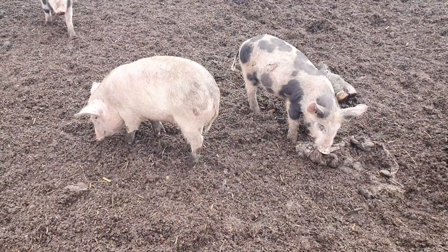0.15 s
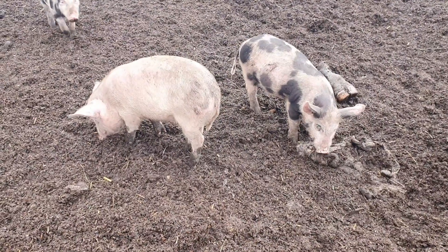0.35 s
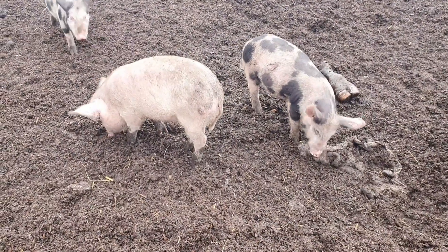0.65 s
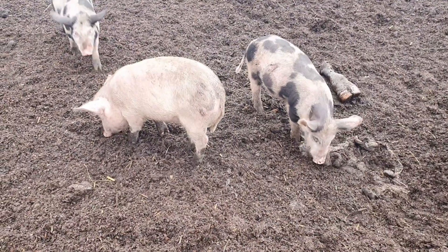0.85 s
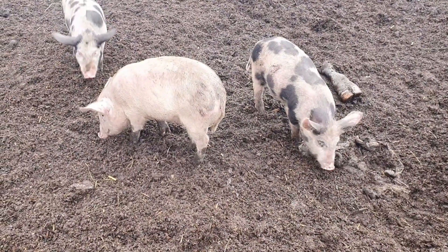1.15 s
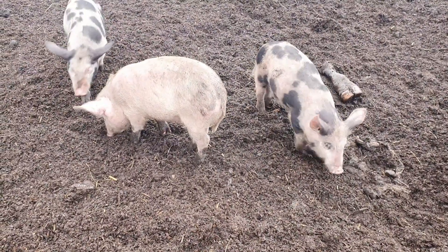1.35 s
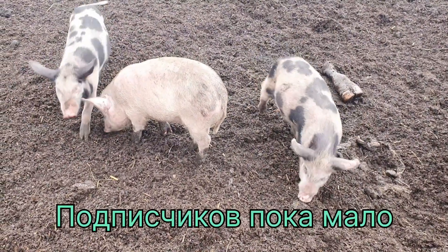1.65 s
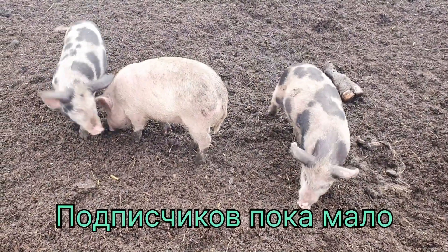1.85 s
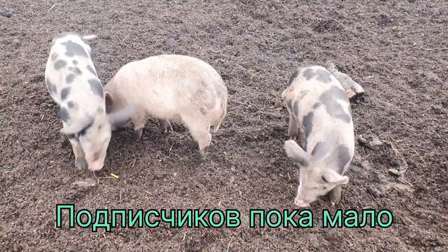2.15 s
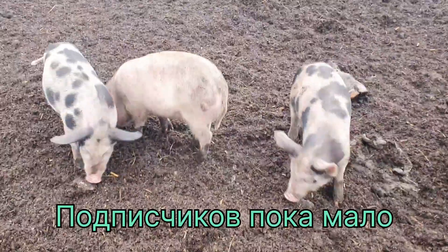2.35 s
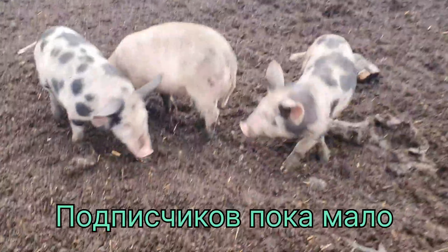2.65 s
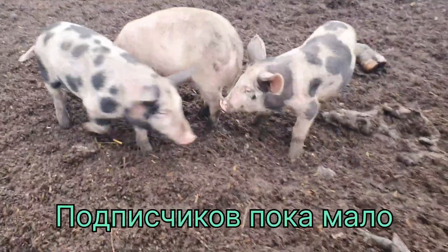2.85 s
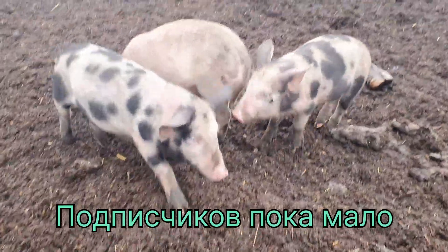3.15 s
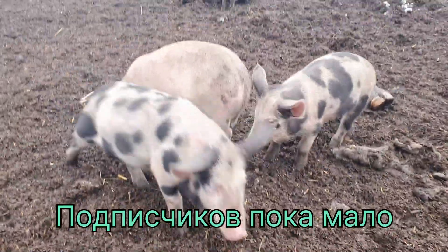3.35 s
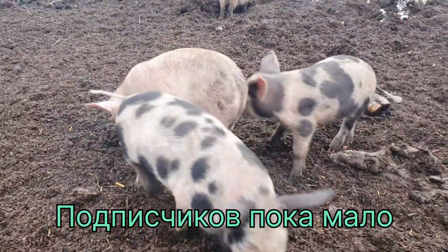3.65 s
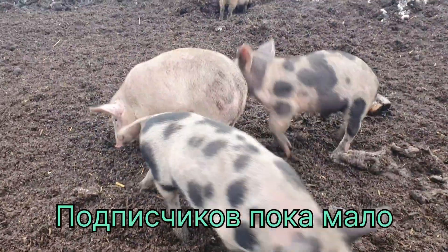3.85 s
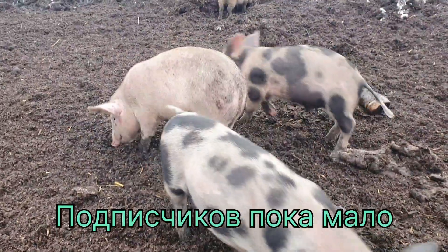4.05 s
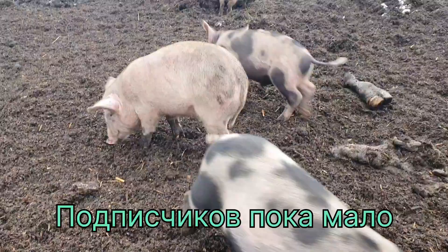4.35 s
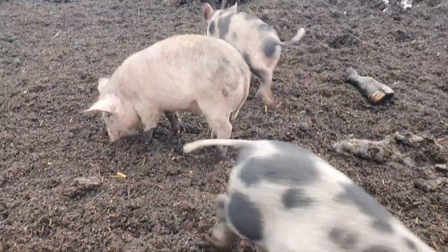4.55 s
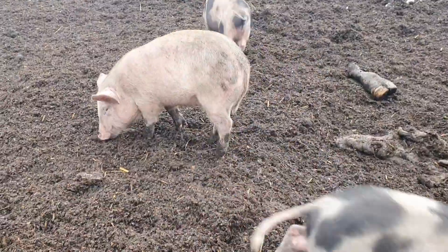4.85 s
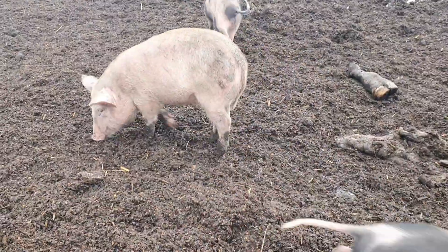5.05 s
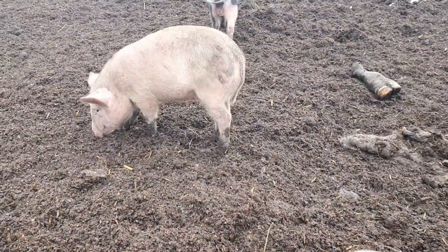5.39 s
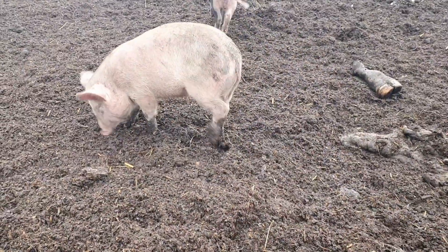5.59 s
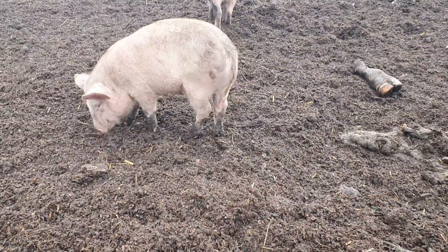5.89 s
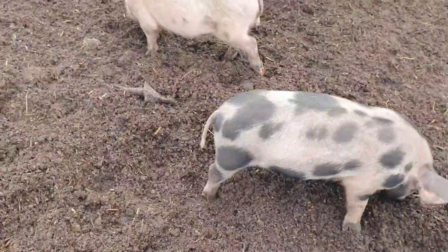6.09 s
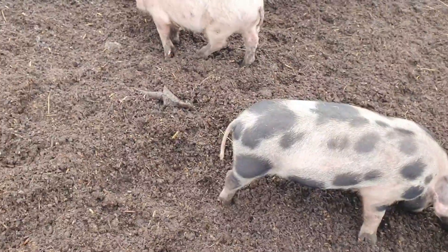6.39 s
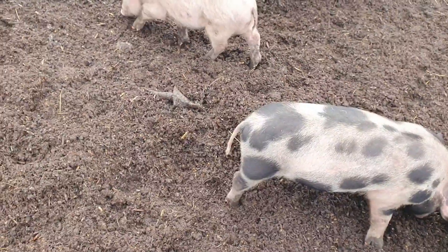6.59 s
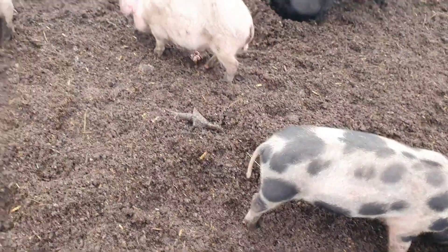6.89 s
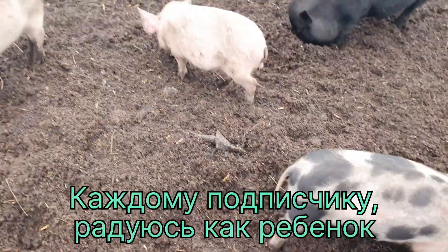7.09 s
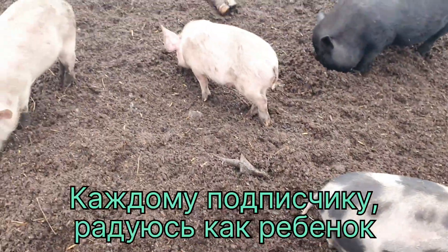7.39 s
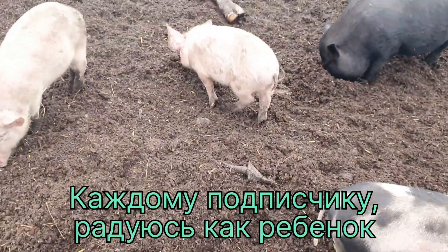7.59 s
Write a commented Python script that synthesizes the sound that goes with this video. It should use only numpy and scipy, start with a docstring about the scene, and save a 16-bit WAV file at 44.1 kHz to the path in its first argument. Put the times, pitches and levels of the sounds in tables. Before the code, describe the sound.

Pigs grunt and root close by in an open, muddy pen, with almost no echo. A few short, low grunts come in the first two seconds, the clearest a bark-like one at about 0.7 seconds. Wet smacks and small squelches are scattered throughout, with tiny snaps of straw. Trotters rustle over the ground, most from 2.5 to 4 seconds. A longer, louder grunt runs from 3 to 3.5 seconds, followed by short ones near 3.8, 4.7, 5.6 and 6.3 seconds. The smacking is busiest between 4.6 and 5.8 seconds. A distant bird trills faintly from 3.6 to 4.7 seconds, and another whistles three slurred notes between 5.5 and 6.3. At about 6.8 seconds a pig gives a rough snarl, catches in its throat and growls, fading by 7.3. Low wind rumbles underneath, growing gustier from about 6.4 seconds to the end.

```python
"""Pigs and piglets grunt in short, separate calls, close to a stereo pair at an open, muddy pen.
Each grunt is one push of effort that swells and fades: it drives a slow train of flaps that ring
the gliding resonances of the throat and thump in the chest. Snouts and mouths smack wetly as they
root, a hoof knocks and a throat catches before a growl. Trotters rustle over the litter, small
birds call farther off and a gusty wind rumbles on the microphones."""
import sys
import numpy as np
from scipy import signal
from scipy.io import wavfile
from scipy.ndimage import uniform_filter1d

SR = 44100
rng = np.random.default_rng(int(sys.argv[2]) if len(sys.argv) > 2 else 0)


def transcribe(signal):
    """Save signal, clipped to [-1, 1], as a 16-bit WAV file at the path in sys.argv[1]."""
    frames = np.atleast_2d(signal).T
    limited = np.clip(frames, -1, 1)
    pcm = np.round(limited * 32767).astype(np.int16)
    wavfile.write(sys.argv[1], SR, pcm)


N = 340893
TIME = np.arange(N) / SR


def from_db(db):
    """Decibels to gain."""
    return 10 ** (np.asarray(db) / 20)


def rms_one(x):
    """Scale to unit rms."""
    return x / np.sqrt(np.mean(x ** 2) + 1e-20)


def read(rows, t):
    """The columns of a curve at times t."""
    s, *columns = np.transpose(rows)
    return [np.interp(t, s, c) for c in columns]


def at_hz(points, hz):
    """A spectrum's value at one frequency."""
    frequencies, values = np.transpose(points)
    return np.interp(np.log(hz), np.log(frequencies), values)


def cut(x, hz, kind, order=2):
    """Butterworth filter."""
    sos = signal.butter(order, np.clip(hz, 10, .45 * SR), kind, fs=SR, output="sos")
    return signal.sosfilt(sos, x)


def resonate(x, hz, width_hz):
    """One resonance, gain 1 at its peak."""
    r = np.exp(-np.pi * width_hz / SR)
    poles = [1, -2 * r * np.cos(2 * np.pi * hz / SR), r * r]
    return signal.lfilter(np.array([1, 0, -1]) * (1 - r * r) / 2, poles, x)


def drift(rate_hz):
    """A random wander with spread 1, mostly slower than rate_hz."""
    r = np.exp(-80 * np.pi * rate_hz / SR)
    slow = signal.lfilter([1], [1, -2 * r, r * r], rng.standard_normal(N // 40 + 2002))[2000:]
    return np.interp(np.arange(N) / 40, np.arange(len(slow)), rms_one(slow))


def add(out, s, x):
    """Mix x into out from time s on."""
    i = int(np.clip(round(s * SR), 0, out.shape[-1]))
    out[..., i:i + x.shape[-1]] += x[..., :out.shape[-1] - i]


def place(x, lag_ms, pan_db):
    """A source to one side: the left microphone gets it lag_ms later and pan_db louder than the right."""
    n, half = np.arange(len(x)), lag_ms * SR / 2000
    left = np.interp(n - half, n, x) * from_db(pan_db / 2)
    right = np.interp(n + half, n, x) * from_db(-pan_db / 2)
    return np.array([left, right])


def banded_noise(spectrum, patchy_db):
    """Half-octave bands of stereo noise, each flickering on its own; rms 1."""
    # how alike the two microphones hear it: (frequency [Hz], left-right correlation [0-1])
    likeness = [(30, 0.78), (80, 0.78), (300, 0.54), (800, 0)]
    out, edges = 0, 20 * 2 ** np.arange(0, 10.1, .5)
    white = rng.standard_normal((2, 2, N))
    for k, (low, high) in enumerate(zip(edges, edges[1:])):
        hz = np.sqrt(low * high)
        if high > spectrum[0][0] and low < spectrum[-1][0]:
            mid, side = cut(white[k % 2], [low, high], "band")
            alike = at_hz(likeness, hz)
            band = np.sqrt(1 + alike) * mid + np.sqrt(1 - alike) * side * [[1], [-1]]
            out = out + from_db(at_hz(spectrum, hz) + patchy_db * drift(6.3)) * band
    return rms_one(out)


def yard(x, t60, dull_hz):
    """Thin scattered echoes from ground and fences, different at each microphone."""
    t = TIME[:SR // 2]
    echoes = cut(rng.standard_normal((2, len(t))) * from_db(-60 * t / t60) * (t > .003), dull_hz, "low")
    echoes = echoes / np.linalg.norm(echoes, axis=1, keepdims=True) * np.sqrt(2 * dull_hz / SR)
    return signal.fftconvolve(x, echoes, axes=1)[:, :N]


def open_air(level_db=-60):
    """The faint rumble and hiss of the open air around the pen."""
    # its spectrum: (frequency [Hz], relative level [dB])
    colour = [(20, -5), (60, 8), (140, -6), (330, -8), (560, -25), (1500, -21), (2500, -8.5), (5000, -13),
              (9000, -46), (16000, -29)]
    return from_db(level_db) * banded_noise(colour, patchy_db=2.5)


def wind(breeze_left_db=3, gust_left_db=7):
    """A low breeze and bell-shaped gusts buffet the microphones, the left one harder."""
    # strength of the breeze: (time [s], level [dB])
    breeze_levels = [(0, -62.5), (2.1, -63), (2.6, -56), (4.2, -55), (5.6, -61), (6.4, -48.5),
                     (7.73, -51.5)]
    # gusts on top of it: (time [s], peak level [dB], half width [s])
    gust_peaks = [(1.05, -50.5, 0.077), (3.65, -49.5, 0.38), (6.415, -40, 0.034), (6.958, -36.5, 0.1),
                  (7.18, -37, 0.067), (7.658, -38.5, 0.054)]
    # spectra of breeze and gusts: (frequency [Hz], relative level [dB])
    breeze_colour = [(22, -13.5), (45, -3.5), (68, -3.5), (100, -19), (160, -30.5), (300, -18),
                     (700, -47.5)]
    gust_colour = [(30, -27), (48, -9), (70, 4.5), (100, -13.5), (160, -28.5), (300, -21)]
    breeze = from_db(read(breeze_levels, TIME)[0]) * banded_noise(breeze_colour, patchy_db=4)
    swells = sum(from_db(db) * np.exp(-.5 * ((TIME - s) / half) ** 2) for s, db, half in gust_peaks)
    gusts = swells * banded_noise(gust_colour, patchy_db=0)
    sides = np.array([[.5], [-.5]])
    return breeze * from_db(breeze_left_db * sides) + gusts * from_db(gust_left_db * sides)


def far_chirps(centre_hz=2750):
    """Distant birds twitter: a thin gliding tone that comes and goes."""
    hz = centre_hz * (1 + .12 * drift(6) + .0121 * drift(185))
    return from_db(-63) * np.clip(drift(6.3) + .3, 0, 1.5) * np.sin(2 * np.pi * np.cumsum(hz) / SR)


def whistle(rows, waver, overtone_db, harmonic=2):
    """A bird's note: a sine with one overtone that follows a pitch curve and wavers quickly."""
    hz, db = read(rows, TIME)
    gate = uniform_filter1d(1.0 * (TIME > rows[0][0]) * (TIME < rows[-1][0]), size=200)
    phase = 2 * np.pi * np.cumsum(hz * (1 + waver * drift(156))) / SR
    tone = np.sin(phase) + from_db(overtone_db) * np.sin(harmonic * phase)
    return gate * from_db(db + 3.4 * drift(94)) * tone


def trill(centre_hz=4650, note_share=.555):
    """A bird far off to the left sings short upward sweeps, blurred by the trees in between."""
    # the notes widen as they slow: (time [s], level [dB], rate [notes/s], sweep [Hz])
    course = [(3.597, -55, 21.6, 600), (3.95, -52, 18.6, 1960), (4.7, -54.5, 15, 2110)]
    db, notes_per_s, sweep_hz = read(course, TIME)
    singing = (TIME > course[0][0]) * (TIME < course[-1][0])
    cycle = np.cumsum(notes_per_s * singing) / SR % 1
    in_note = np.clip((cycle - .5) / note_share, -.5, .5)   # 0 at the middle of a note
    hz = (centre_hz + sweep_hz * in_note) * (1 + .036 * drift(500))
    envelope = singing * from_db(db + 1.85 * drift(27)) * np.cos(np.pi * in_note)
    notes = place(envelope * np.sin(2 * np.pi * np.cumsum(hz) / SR), lag_ms=.24, pan_db=6.5)
    return notes + 2 * yard(notes, t60=.15, dull_hz=6000)


def song():
    """A songbird whistles slurred figures."""
    # shape of each figure: (time from its start [s], pitch [Hz], relative level [dB])
    figures = { "swoop": [(0, 4050, -8.5), (.016, 3160, -1.5), (.027, 2400, -3.5), (.045, 2218, -3.5),
               (.069, 2630, -4), (.124, 2620, -13), (.184, 2589, -26)], "arch": [(0, 3164, -6),
               (.01, 2400, -8), (.038, 2614, -1), (.058, 3104, 1), (.085, 3267, -14), (.118, 2445, -1),
               (.153, 2280, -26)]}
    # the whistles: (start [s], level [dB], figure)
    calls = [(5.515, -38, "swoop"), (5.777, -37.5, "swoop"), (6.157, -37, "arch")]
    out = np.zeros(N)
    for start, level_db, figure in calls:
        curve = [(start + s, hz, level_db + db) for s, hz, db in figures[figure]]
        out += whistle(curve, waver=.0092, overtone_db=-31, harmonic=4)
    return out


def birds():
    """Beyond the pen: song and a far hoot to the right, a trill to the left, a thin high call ahead."""
    # the high call and the hoot: (time [s], pitch [Hz], level [dB])
    high_curve = [(2.095, 6850, -60), (2.2, 6730, -75)]
    hoot_curve = [(7.45, 479.5, -53.5), (7.52, 474, -58)]
    high_call = whistle(high_curve, waver=.01, overtone_db=-40)
    hoot = place(whistle(hoot_curve, waver=.0057, overtone_db=-1.5), lag_ms=.18, pan_db=-6)
    return place(song(), lag_ms=.586, pan_db=-6) + trill() + high_call + hoot


def litter(grain_db=2.5, grain_hz=220):
    """Litter under trotters: a continuous rustle with a fine crackling grain."""
    # strength of the rustle: (time [s], level [dB])
    levels = [(0, -61), (2.1, -59), (2.7, -49.5), (3.75, -51.5), (4.3, -56.5), (5.7, -57.5), (7.73, -58.5)]
    # its spectrum: (frequency [Hz], relative level [dB])
    colour = [(150, -4.5), (320, -2), (900, -4), (1650, -7), (2200, -3), (3300, -11.5), (6000, -12),
              (9200, -23.5), (12000, -19.5), (16000, -22.5)]
    rustle = banded_noise(colour, patchy_db=2.6)
    return from_db(read(levels, TIME)[0] + grain_db * drift(grain_hz)) * rustle


def straw_ticks(faint_db=-55, spread_db=9, decay_s=.0031, low_hz=2600, count=80):
    """Grit and dry stalks snap crisply under trotters and snouts: a few loud ones and many faint."""
    # the loudest snaps: (time [s], level [dB])
    stalks = [(1.376, -48), (1.862, -45.5), (2.293, -42), (5.672, -44)]
    out, t = np.zeros((2, N)), TIME[:SR // 50]
    faint = [(when * N / SR, faint_db - spread_db * size) for when, size in rng.random((count, 2))]
    for s, db in stalks + faint:
        snap = cut(rng.standard_normal(len(t)) * np.exp(-t / decay_s), low_hz, "high", order=1)
        add(out, s, place(from_db(db) * snap, rng.random() - .5, 0))
    return out


def pop_burst(cavity_hz, treble_db, length, spray_db=-20, pops_per_s=2200, gritty_db=4):
    """A quick run of tiny pops rings a cavity, as when a wet film tears in the mouth; peak 1."""
    t = TIME[:SR // 8]
    envelope = (1 - np.exp(-t / (.66 * length))) * np.exp(-t / length)
    pops = (rng.random(len(t)) < pops_per_s / SR) * rng.choice([-1, 1], len(t))
    pops = pops * from_db(gritty_db * rng.standard_normal(len(t))) * envelope
    cavity = rms_one(resonate(resonate(pops, cavity_hz, 260), cavity_hz, 1380))
    treble = resonate(pops, 4240, 1240) - resonate(pops, 5420, 2150)
    treble += from_db(-4.5) * resonate(pops, 8850, 3100) + from_db(-3) * resonate(pops, 690, 2230)
    treble = rms_one(cut(treble, 7640, "low"))
    spray = rms_one(resonate(pops, 10300, 4500))
    burst = cavity + from_db(treble_db) * treble + from_db(spray_db) * spray
    return burst / np.abs(burst).max()


def rooting(boost_db=4.5, squelch_db=-53, count=70):
    """Close by, wet smacks of mouths and snouts, a low hoof knock and a sharp catch in a pig's throat."""
    # smacks, the hoof (1.934 s) and the catch (6.977 s): (time [s], peak before the boost [dB],
    # cavity [Hz], treble over cavity [dB], finest spray over cavity [dB], length [s])
    bursts = [(0.887, -40, 2750, -0.5, -14, 0.0082), (1.42, -46, 2400, -16, -21, 0.006),
              (1.459, -36, 2880, -14, -17, 0.0021), (1.928, -39, 2480, -16, -15, 0.012),
              (1.934, -35, 846, -23, -36, 0.0046), (2.255, -44.5, 2430, -9, -27, .04),
              (2.722, -26, 2320, -27, -26, 0.0026), (2.892, -44.5, 2350, -12, -27, 0.026),
              (3.228, -30, 2300, -8, -20, 0.0043), (3.317, -42.5, 2800, -19, -26, .034),
              (3.86, -31.5, 1540, -33, -33, 0.0085), (3.899, -28, 2320, -3.5, -25, 0.0099),
              (4.2368, -32, 2110, -18, -19.5, 0.0087), (4.6234, -39.5, 2500, 1.5, -9, 0.011),
              (4.741, -31, 2400, -34, -31, 0.0049), (4.779, -25.5, 1780, -16, -50, 0.0092),
              (4.807, -27, 2140, -20, -37, 0.0037), (4.845, -35.5, 2150, 5, -31, 0.0092),
              (5.108, -38.5, 3000, -29, -30, 0.0067), (5.188, -32, 2070, 11, -33, 0.0089),
              (5.25, -39, 3480, 9, -2, 0.0075), (5.298, -29, 2010, -7, -11, 0.0077),
              (5.307, -25, 2310, -2.5, -6.5, 0.011), (5.347, -31, 5470, -7.5, -5.5, 0.003),
              (5.623, -37.5, 2640, 4.5, 1, 0.016), (5.71, -35, 4500, 23, 15, 0.019),
              (5.729, -31.5, 3980, 11, -12, 0.0073), (5.946, -40, 2500, 15, 8.5, 0.0099),
              (6.325, -42.5, 3700, 41, -5, 0.0097), (6.912, -38.5, 5100, -0.5, -11, 0.0095),
              (6.977, -24, 1230, -62, -70, 0.00087)]
    out = np.zeros((2, N))
    for s, db, hz, treble_db, spray_db, length in bursts:
        burst = from_db(db + boost_db) * pop_burst(hz, treble_db, length, spray_db)
        add(out, s, place(burst, lag_ms=.5013, pan_db=4))
    for when, size, pitch, side in rng.random((count, 4)):   # soft squelches of mud in between
        squelch = pop_burst(2100 + 1400 * pitch, treble_db=-10.5, length=.01)
        add(out, when * N / SR, place(from_db(squelch_db + 10 * size) * squelch, side - .5, 0))
    return out


def effort(share, crest, rise_db, fade_db):
    """One push, in dB under its top: it swells to the crest, then fades to the end of the grunt."""
    crest = np.clip(crest, .01, .99)
    before = np.clip(1 - share / crest, 0, 1)
    after = np.clip((share - crest) / (1 - crest), 0, 1)
    return -rise_db * before ** 1.96 - fade_db * after ** 1.3


def flap(tract, stretch, opening_db, rough, tilt_db, puff_s=.003, throat_top_hz=1050):
    """One flap of the soft palate: a snap and a puff of air ring the wet tract, never twice alike."""
    t = TIME[:SR // 20]
    puff = rng.standard_normal(len(t)) * np.sqrt(t) * np.exp(-t / puff_s)
    push = np.sqrt(1 - rough) * (t == 0) + np.sqrt(rough) * puff / np.linalg.norm(puff)
    throat, mouth = parts = np.zeros((2, len(t)))   # the lower and the upper resonances
    for hz, width_hz, db in tract:
        now_hz = hz * stretch * (1 + .026 * rng.standard_normal())
        now_db = db - tilt_db * np.log2(hz / throat_top_hz) + 2 * rng.standard_normal()
        ring = resonate(resonate(push, now_hz, width_hz), now_hz, 3 * width_hz)
        parts[int(hz > throat_top_hz)] += from_db(now_db) * ring
        push = -push   # neighbouring resonances swing in opposite senses
    throat = cut(throat, .55 * tract[0][0], "high", order=3)   # little passes below the first resonance
    voice = throat / np.linalg.norm(throat) + from_db(opening_db) * mouth / np.linalg.norm(mouth)
    return cut(voice, 1.5 * tract[-1][0], "low", order=4)   # soft flesh gives little above the last


def grunt(length, rate, rough, crest, throat_db, rise_db, fade_db, mouth_db, chest_db, chest_hz,
          kind, start, jitter=.1098, lift_per_db=.0268, closing_db_per_octave=4):
    """Uneven flaps ring the tract and push the chest as the effort swells and fades: (voice, chest)."""
    # resonances of snout and throat for each kind of grunt: (frequency [Hz], width [Hz], level [dB])
    tracts = { "bark": [(225, 80, -6), (600, 170, -8), (870, 170, -1), (1200, 190, 7), (1680, 140, 1.5),
              (2170, 200, -12), (2950, 520, -19)], "open": [(219, 72, -9.5), (485, 86, 1.5), (808, 142, 9),
              (1380, 167, 6.5), (1570, 125, 1)], "closed": [(294, 72, 0.5), (532, 54, -9.5),
              (712, 110, -10.5), (1110, 214, 7), (1640, 190, -4.5), (2400, 1700, -6)],
              "murmur": [(287, 66, 2), (689, 56, 7), (1180, 58, 0)], "snarl": [(531, 80, 3),
              (835, 144, 4.5), (1387, 150, 5.5), (1900, 210, 3.5), (2750, 620, -10)],
              "growl": [(539, 127, 6), (814, 130, 5.5), (1466, 180, 12), (1770, 150, 0.5),
              (2550, 650, -15)]}
    # how each kind moves: (resonance shift from start to end [share], slowing as effort drops [share/dB])
    moves = {"bark": (0.03, 0.00084), "open": (-0.015, 0.00387), "closed": (0, 0.00292),
             "murmur": (0.034, 0.0203), "snarl": (-0.055, .008), "growl": (-0.032, .018)}
    # the long grunt's wavering pace: (time [s], rate [flaps/s])
    long_pace = [(3.04, 61), (3.125, 67.6), (3.21, 63), (3.32, 68.5), (3.46, 57)]
    t = TIME[:int((length + .05) * SR)]
    voice, pushes = np.zeros((2, len(t)))
    slide, slowing_per_db = moves[kind]
    beat = 0
    for early_late, uneven_db, loose in rng.standard_normal((40, 3)):
        if beat > length:
            break
        push_db = effort(beat / length, crest, rise_db, fade_db)
        past_crest = beat / length - crest
        pace = rate * np.exp(slowing_per_db * push_db) if rate else read(long_pace, start + beat)[0]
        opening_db = mouth_db + .96 * push_db   # effort opens the mouth and lifts the resonances
        stretch = 1 + lift_per_db * push_db + slide * past_crest
        tilt_db = closing_db_per_octave * past_crest   # the closing mouth dulls the grunt
        ring = flap(tracts[kind], stretch, opening_db, rough, tilt_db)
        s = beat + jitter * rough * early_late / pace
        add(voice, s, from_db(throat_db + push_db + uneven_db) * np.sqrt(SR / pace) * ring)
        add(pushes, s + .0011 * abs(loose), from_db([loose]))   # the chest follows a little loosely
        beat += 1 / pace
    chest = resonate(pushes, chest_hz, width_hz=28)
    chest = cut(cut(chest, 225, "low"), 53, "high", order=3)
    chest = chest / np.sqrt(np.sum(chest ** 2) / (SR * length))
    breath = rng.standard_normal(len(t)) * (t < length)
    rasp = from_db(-16) * rms_one(cut(breath, (189, 430), "band"))   # air through the snout
    chest_crest = crest + .16 * (1 - crest)   # the chest crests later than the throat
    swell = from_db(chest_db + effort(t / t[-1], chest_crest * length / t[-1], rise_db=20, fade_db=11))
    return voice + rasp * swell, chest * swell


def pigs():
    """Each grunt comes from its own spot in the pen; the deep chest tone is as loud left as right."""
    # one row per push of effort: (start [s], end [s], rate at the crest [flaps/s; None: wavering pace],
    # roughness [0-1], crest [share of length], throat at the crest [dB], rise [dB], fade [dB],
    # mouth over throat [dB], chest [dB], chest pitch [Hz], left lag [ms], left over right [dB], kind)
    grunts = [ (0.343, 0.486, 55, 0.43, 0.47, -58, 6, 4.5, 1.5, -49, 69, -0.29, 2, "closed"),
              (0.637, 0.773, 40.96, 0.557, 0.47, -38.5, 5, 8.5, 15, -32.5, 58, -0.36, 4, "bark"),
              (0.938, 1.029, 50, 0.4, 0.49, -47, 8.5, 12, -9, -36.5, 114, 0.32, -2, "closed"),
              (1.659, 1.854, 43.96, 0.41, 0.18, -61, 5, 9.5, 1, -43, 82, -0.2, 1, "closed"),
              (3.038, 3.488, None, 0.25, 0.3, -25, 13.5, 9.5, -8, -32, 67.5, 0.41, -3, "open"),
              (3.496, 3.549, 64.5, 0.26, 0.52, -33.5, 5, 14, -14, -36, 70, 0.36, -3.5, "open"),
              (3.793, 3.945, 39.76, 0.21, 0.42, -37, 11.5, 5, -6, -34.5, 72, -0.59, 1, "closed"),
              (4.678, 4.789, 63, 0.73, 1, -41, 13, 10, -1, -30.5, 96.7, 0.46, -2, "closed"),
              (5.009, 5.29, 58.94, 0.87, 0.12, -47.5, 4, 7.5, -6, -46.5, 93, 0.48, -2, "closed"),
              (5.566, 5.706, 46.5, 0.8, 0.58, -38, 15, 23, 2.5, -33, 89, -0.42, 1, "closed"),
              (6.086, 6.174, 63.3, 0.54, 0.83, -48, 10, 12, -7.5, -43.5, 100, 0.41, -4, "closed"),
              (6.303, 6.373, 63, 0.156, 0.81, -29.5, 21.5, 3, -19, -37.5, 75.5, 0.4, -2.5, "open"),
              (6.564, 6.793, 50.1, 0.26, 0.59, -50, 3, 7.5, -0.5, -45, 90.5, 0.3, -3, "murmur"),
              (6.816, 6.979, 82.2, 0.8, 0.42, -28.5, 9.5, 3.5, 0.5, -34.5, 92, 0.2, -1.5, "snarl"),
              (6.987, 7.141, 70, 0.43, 0.012, -33, 1, 10, 1.5, -36, 77.4, 0.19, -3, "growl"),
              (7.15, 7.24, 66.3, 0.82, 0.24, -39, 1, 6.5, -8, -38, 76.6, 0.25, -2, "growl"),
              (7.24, 7.333, 65.9, 0.86, 0.46, -44.5, 1, 6, -10, -47, 77, 0.23, -2, "closed")]
    out = np.zeros((2, N))
    for start, end, *manner, lag_ms, pan_db, kind in grunts:
        voice, chest = grunt(end - start, *manner, kind, start)
        add(out, start, place(voice, lag_ms, pan_db) + place(chest, lag_ms, 0))
    return out


def scene():
    """From the side of the pen: pigs close and almost dry, birds far and echoing, rustle, air, wind."""
    near = pigs() + rooting() + straw_ticks()
    far = birds()
    air = open_air()
    ground = from_db(-15) * yard(near, t60=.055, dull_hz=6000)
    near_echo = ground + from_db(-22) * yard(near, t60=.35, dull_hz=3000)
    far_echo = yard(from_db(-3) * far + far_chirps(), t60=.61, dull_hz=6300)
    return near + near_echo + far + far_echo + litter() + air + wind()


def record(dry, cutoff_hz=15900):
    """The highest treble is cut steeply."""
    return signal.sosfilt(signal.ellip(12, .1, 90, cutoff_hz, fs=SR, output="sos"), dry)


dry = scene()
out = record(dry)
transcribe(out)
```